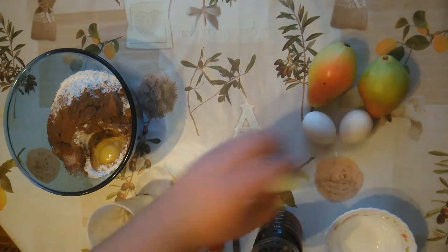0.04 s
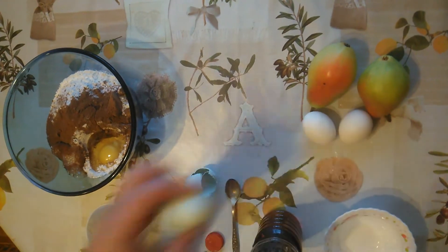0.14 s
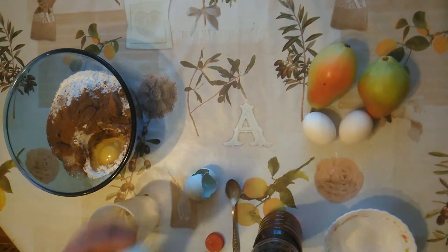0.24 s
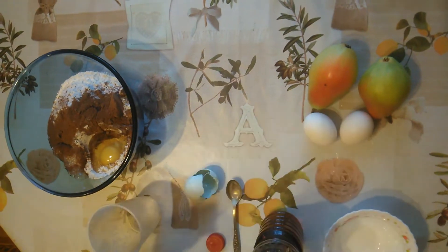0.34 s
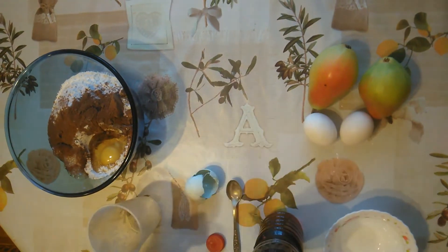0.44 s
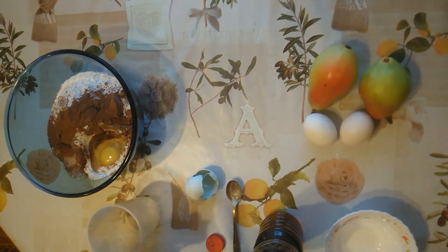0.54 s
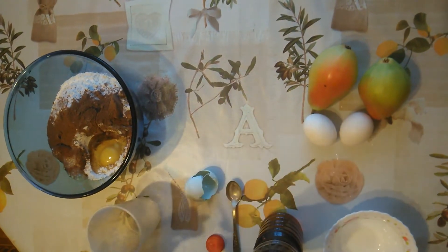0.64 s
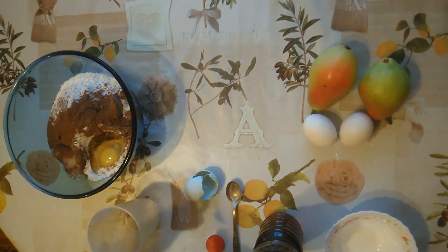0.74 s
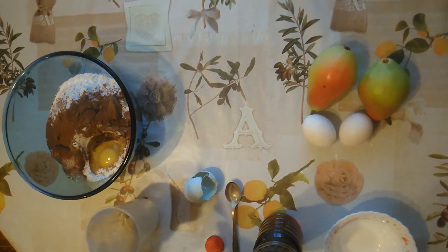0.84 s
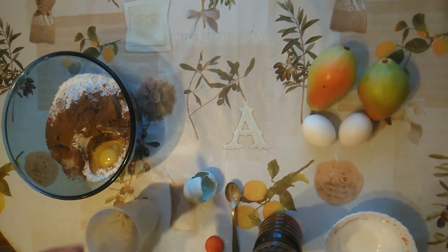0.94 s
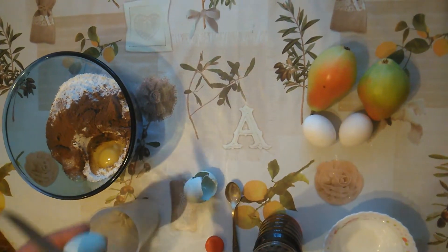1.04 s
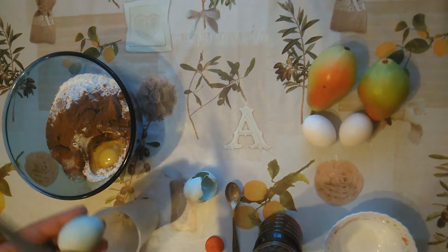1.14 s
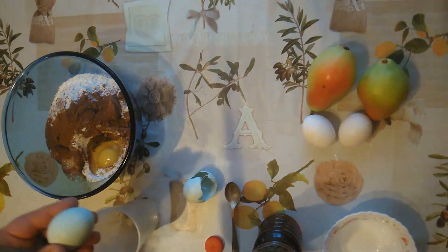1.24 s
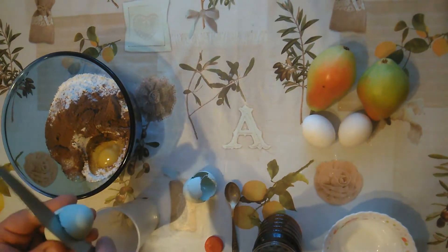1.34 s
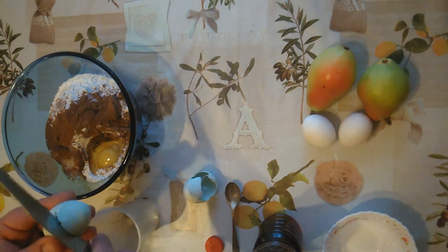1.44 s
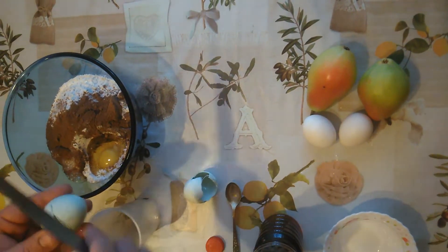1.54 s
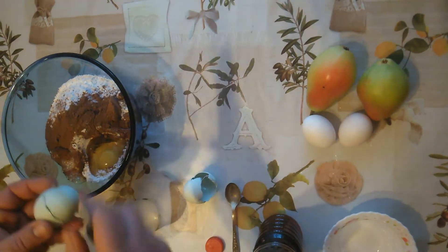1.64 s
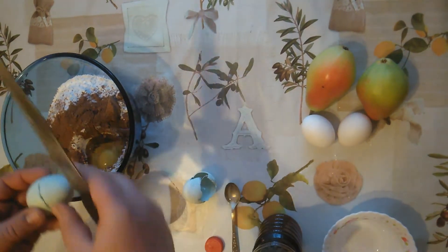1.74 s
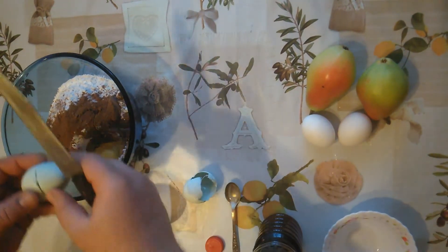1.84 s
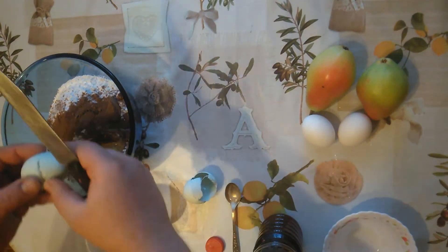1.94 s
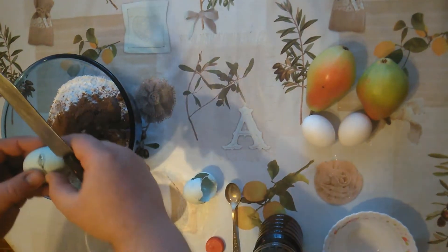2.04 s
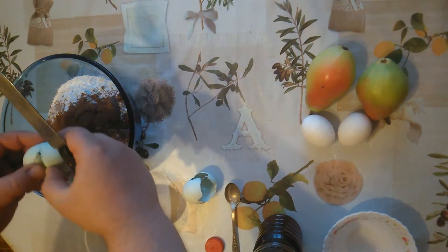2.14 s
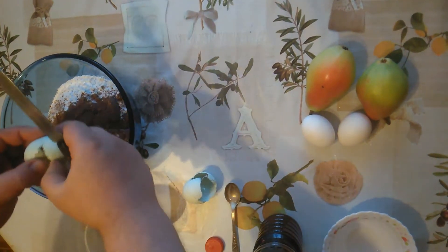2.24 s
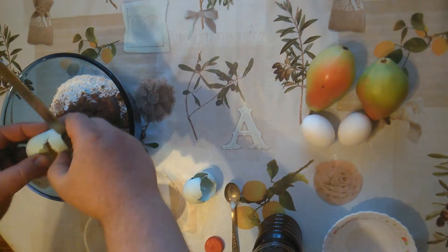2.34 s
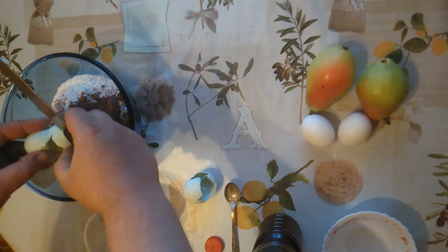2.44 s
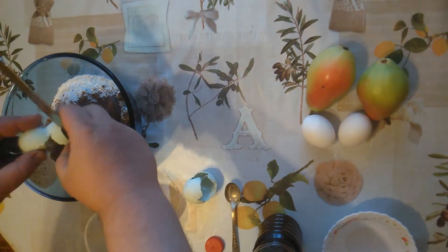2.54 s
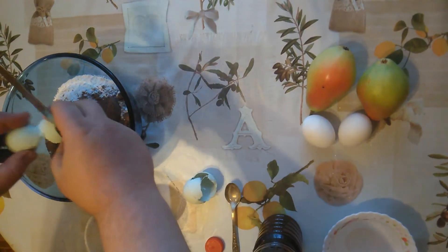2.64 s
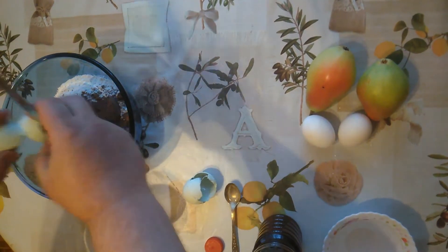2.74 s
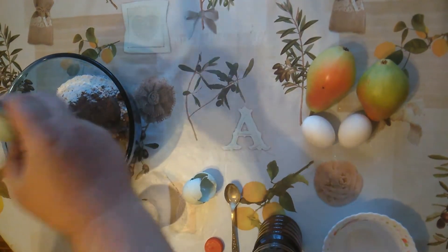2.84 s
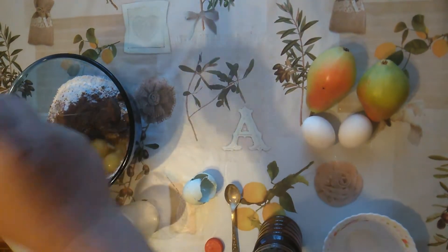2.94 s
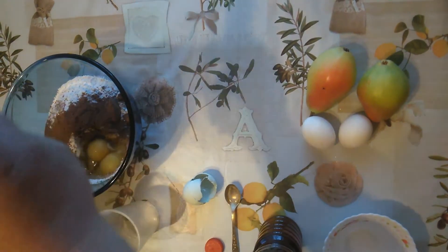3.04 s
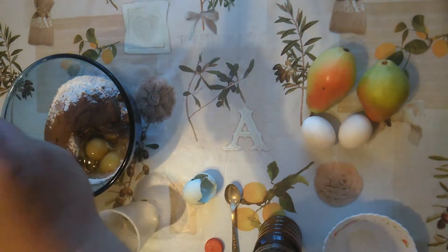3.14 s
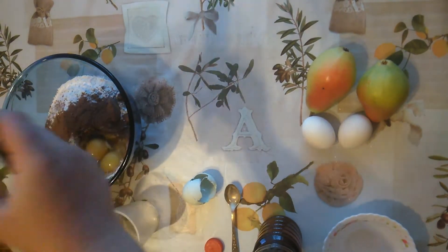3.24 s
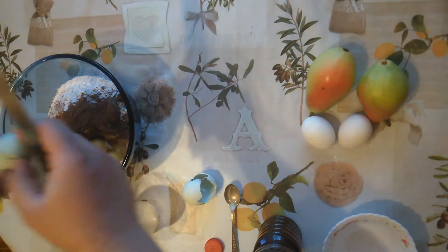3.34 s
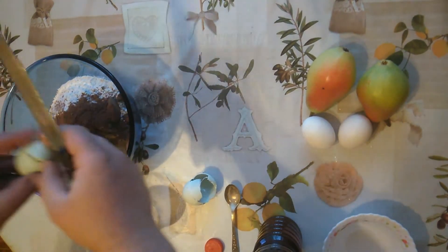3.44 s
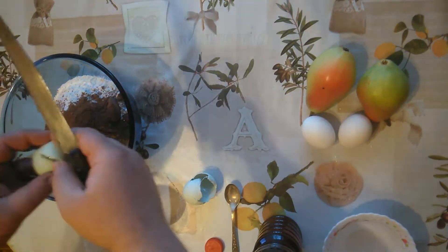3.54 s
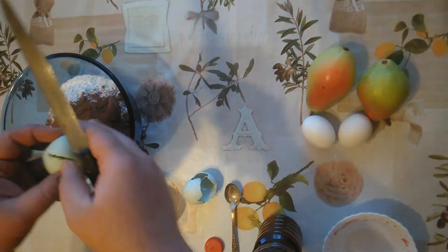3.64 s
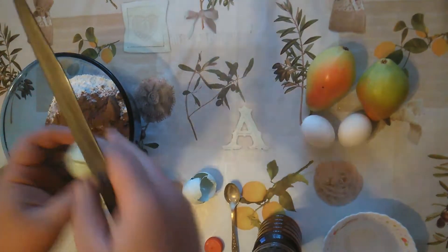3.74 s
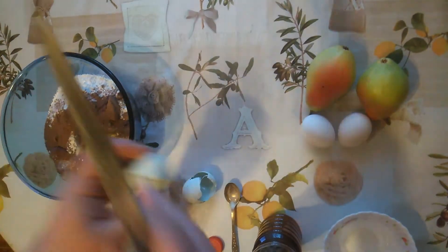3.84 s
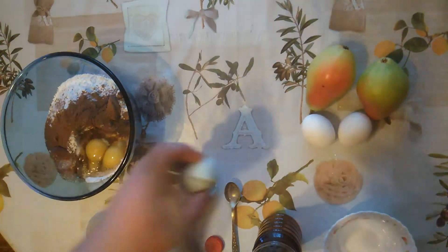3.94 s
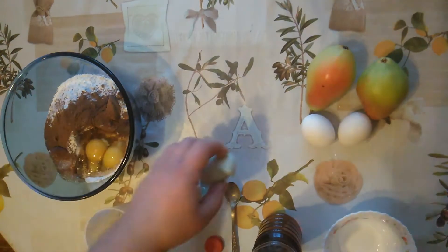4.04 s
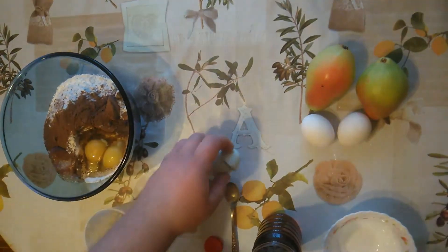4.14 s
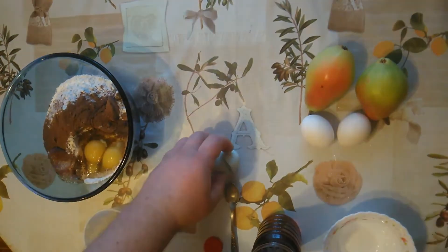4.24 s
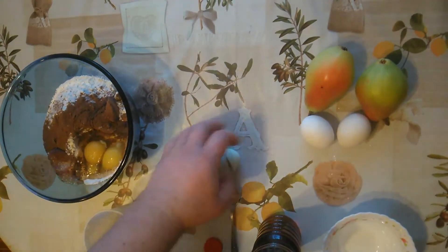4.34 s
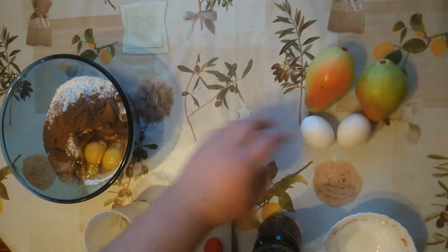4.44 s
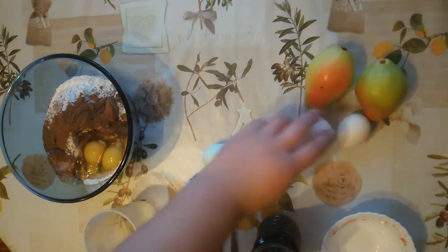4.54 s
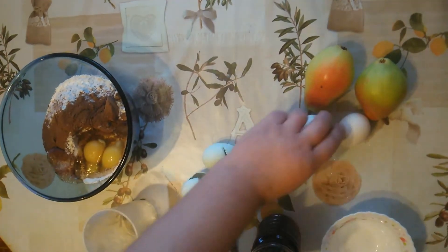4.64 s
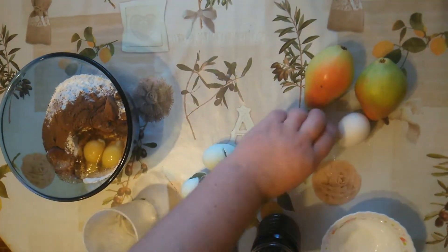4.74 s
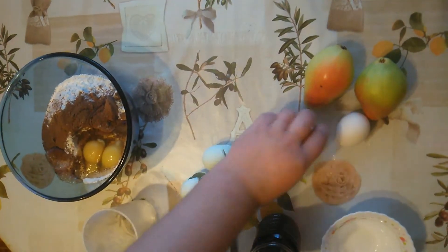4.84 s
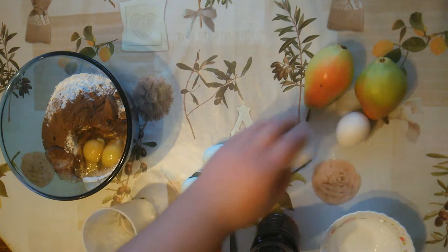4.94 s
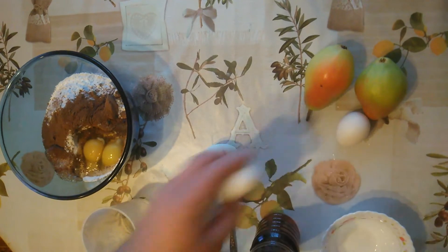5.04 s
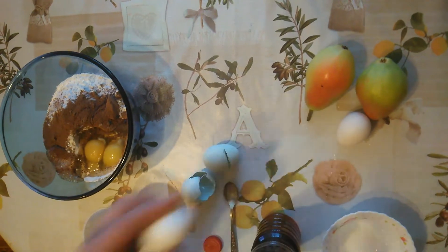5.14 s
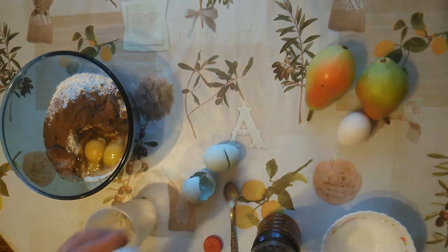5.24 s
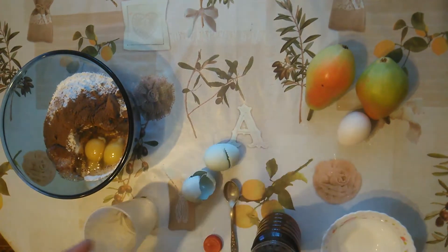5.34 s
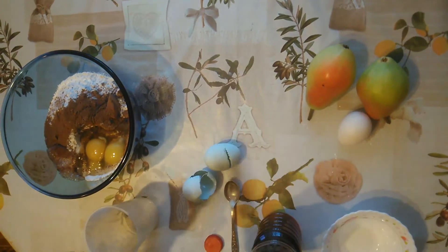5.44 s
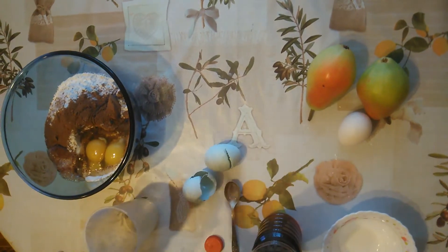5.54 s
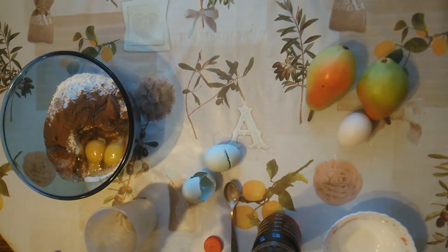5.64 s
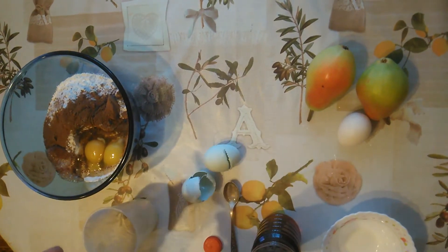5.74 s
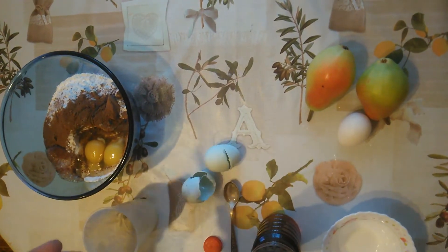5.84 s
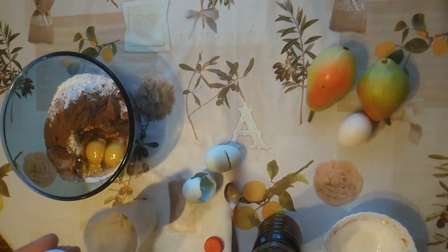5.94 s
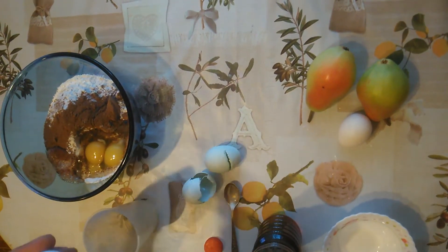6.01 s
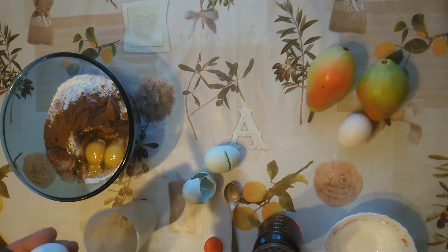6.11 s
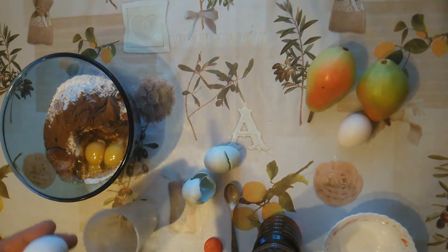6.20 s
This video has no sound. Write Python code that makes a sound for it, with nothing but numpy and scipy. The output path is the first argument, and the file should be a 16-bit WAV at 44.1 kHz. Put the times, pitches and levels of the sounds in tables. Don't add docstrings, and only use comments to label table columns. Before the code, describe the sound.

Close, dry eggshell cracks and crunches in a small echoing kitchen: one hard knife blow, brittle snapping, a light tap, another hard blow.

```python
import sys
import numpy as np
from scipy import signal
from scipy.io import wavfile

SR = 44100
rng = np.random.default_rng(int(sys.argv[2]) if len(sys.argv) > 2 else 0)


def bounce(signal):
    frames = np.transpose(np.atleast_2d(signal))
    limited = np.clip(frames, -1, 1)
    pcm = np.round(limited * 32767).astype(np.int16)
    wavfile.write(sys.argv[1], SR, pcm)


def volts_from_decibels(level):
    exponent = np.asarray(level, float) / 20
    return 10 ** exponent


N = 276507

# (time [s], level
# [dB])
BUSTLE = [(0.0, -56.5), (0.42, -61.5), (0.7, -60), (1.1, -56), (1.22, -53.5), (1.37, -53.5), (1.47, -46.5),
          (1.85, -57.5), (2.16, -55), (2.29, -60.5), (2.42, -48), (2.7, -49), (3.2, -57), (3.65, -50.5),
          (4.1, -54.5), (4.7, -53.5), (5.3, -57), (6.27, -53)]
# (time [s], room modes [dB], deep rumble [dB], spread [s])
THUDS = [(.07, -63, -66, 0.026), (.19, -55, -76, 0.077), (.52, -61.5, -73, 0.018), (.81, -65, -65.5, 0.071),
         (1.111, -54.5, -68, 0.028), (1.319, -52.5, -57, 0.018), (2.181, -51.5, -81, 0.0096),
         (2.38, -52, -70, 0.024), (2.62, -52, -68.5, 0.28), (2.88, -53.5, -73, 0.067),
         (3.099, -52.5, -73.5, 0.11), (3.33, -53.5, -59, 0.048), (3.47, -51, -67, 0.073),
         (3.6, -54.5, -67, 0.086), (3.79, -49, -68, 0.12), (4.03, -50.5, -59.5, 0.041),
         (4.152, -49, -68, 0.052), (4.37, -55.5, -76, 0.036), (4.52, -54, -72, 0.093),
         (4.9, -48, -66, 0.12), (5.099, -43.5, -74, 0.01), (5.259, -46, -71, 0.041), (5.55, -53, -83, 0.1),
         (5.66, -48, -62.5, 0.089), (5.859, -53, -69, 0.051), (6.04, -51, -78, 0.025),
         (6.162, -51.5, -63, 0.018), (6.27, -67, -66, 0.015)]
# (frequency [Hz], width [Hz], level [dB])
ROOM_MODES = [(162.3, 12, -23), (223, 4, 11.5), (258.3, 10, 12), (301, 2.6, 2), (346, 13, -24.5)]
# (frequency [Hz], density [dB per Hz])
MIDDLE_WASH = [(190, -12.5), (330, -7), (447, -2.5), (696, -5), (720, -2.5), (885, -16), (943, -6),
               (1000, -27.5), (1300, -12.5), (1690, -59.5), (2860, -120)]
# (frequency [Hz], density [dB per Hz])
HISS = [(710, -5), (1200, -25), (1270, -27), (1490, 0.5), (1870, -3.5), (2020, 0), (2110, 0), (2250, -5.5),
        (2590, -0.5), (3010, -9), (4550, -11), (9210, -24), (16000, -33)]
# (frequency [Hz], density [dB per Hz])
RUMBLE = [(20, -12), (40, -15.5), (70, -6), (110, -3), (160, 4.5), (200, -2)]
HISS_DB, HISS_FOLLOWS = -65, 0.98
MODES_DB, MODES_FOLLOW = -64.5, 0.68
DEEP_DB, DEEP_FOLLOWS = -76.5, 0.54

MOTOR_HZ = 49.33
# (multiple of shaft speed [1], level [dB])
WHINE = [(15, -74), (21, -81), (22, -77.5), (23, -73), (24, -73.5), (42, -71.5)]
# (start [s], hold [s], level [dB])
SINGING = [
    (1.198, 0.33, -53),
    (3.023, 0.13, -51.5),
]
SING_RISE_DB_PER_S, SING_FALL_DB_PER_S = 450, 309

# (start [s], hold [s], level [dB], hollow pitch [Hz], bright share [dB])
RUBS = [(0.0, 0.23, -35, 1600, -34), (0.035, 0.26, -49.5, 2700, -22), (0.045, 0.23, -60, 4330, -30),
        (1.569, 0.016, -32, 5340, -32.5), (1.573, 0.013, -16, 3710, -15), (1.593, 0.013, -41.5, 3830, -27),
        (0.884, 0.022, -44.5, 4130, -8), (2.48, 0.043, -30, 2500, -12), (2.168, 0.059, -35.5, 2760, -5.5),
        (2.156, 0.099, -35.5, 870, -21), (2.484, 0.058, -27, 1520, -9), (2.65, 0.0086, -32, 1490, -4.5),
        (2.72, 0.024, -32, 1810, -5), (3.084, 0.21, -40.5, 1990, -11.5), (3.309, 0.11, -27, 1370, -14),
        (3.478, 0.16, -24, 1380, -34), (3.55, .07, -43, 2350, -27), (3.66, 0.064, -19, 2200, -17),
        (3.825, 0.5, -55, 1450, 4.5), (4.389, 0.022, -15, 1310, -22), (4.331, 0.0084, -25, 1380, -15),
        (4.433, 0.19, -35.5, 1460, -38), (4.482, 0.31, -43, 2500, -33), (4.45, 0.25, -56, 4320, -25),
        (4.614, 0.28, -36.5, 1250, -47), (5.217, 0.51, -52, 4310, -25), (4.9, .8, -56, 2600, -30),
        (2.705, .06, -38, 1000, -20)]
RUB_RISE_DB_PER_S, RUB_FALL_DB_PER_S = 607.5, 297

# (time [s], peak [dB],
# hollow pitch [Hz], bright edge [dB])
TOUCHES = [(0.888, -40, 866, -14), (1.398, -30, 2200, -15), (1.566, -24, 5400, -21),
           (1.570, -26, 5530, -18), (1.578, -19, 1150, -16), (1.587, -25, 3800, -20),
           (1.596, -19, 3900, -17), (1.597, -23, 1900, -3), (5.986, -46, 5140, -30),
           (6.100, -32, 2110, -28), (6.147, -38, 1660, -44), (6.157, -31, 2170, -24),
           (6.1618, -13, 2000, -8), (6.1675, -13, 2100, 2), (6.172, -15, 2500, -16),
           (1.4195, -10.5, 2300, -13.5), (2.703, -31, 3100, -8), (2.643, -41, 5140, -3),
           (2.710, -40, 5200, -10), (2.753, -36, 2890, -11), (2.4705, -14.5, 3140, -11),
           (1.588, -25, 2190, -15), (5.832, -29, 890, -20), (5.836, -27, 4250, -15), (5.850, -23, 755, -7),
           (5.853, -34, 4250, -16), (5.869, -28, 710, -25), (5.878, -39, 4250, -25), (2.534, -30, 2600, -1),
           (3.699, -27.5, 2530, 1), (3.713, -22.5, 1385, -34), (3.542, -23, 4040, -10),
           (3.590, -26, 4150, -17)]
# (time [s], peak [dB], hollow pitch [Hz], bright edge [dB])
PRISING = [(2.162, -38, 2930, -15), (2.181, -29.5, 2820, -7), (2.377, -14.5, 3450, -14),
           (2.381, -15, 3030, -23), (2.394, -10.5, 2895, -13.5), (2.404, -16, 2590, -16),
           (2.411, -22, 2600, -13), (2.469, -13.5, 1660, -8), (2.487, -23, 2150, -29),
           (2.498, -32, 1840, -16), (2.505, -17.5, 1450, -27), (2.518, -17.5, 1550, -16),
           (2.532, -23, 1384, -21), (2.6435, -23, 1360, -14), (2.702, -21, 1597, -5.5),
           (2.741, -33, 800, -31), (2.729, -33, 900, -20), (2.754, -33, 900, -12), (2.852, -34, 1450, -33)]
# (time [s], peak [dB], hollow pitch [Hz], bright edge [dB])
SQUEEZING = [(3.111, -39, 2000, -31), (3.178, -36, 1460, -19), (3.203, -34, 1940, -15),
             (3.238, -34.5, 1460, -38), (3.265, -27.5, 1490, -19), (3.304, -26, 1460, -5),
             (3.347, -16.5, 1450, -27), (3.359, -16.5, 1420, -16.5), (3.378, -28.5, 2550, 6),
             (3.395, -37, 1340, -23), (3.411, -16.5, 1450, -35.5), (3.461, -30, 1290, -15.5),
             (3.476, -10, 1404, -23), (3.488, -12, 1470, -30), (3.494, -18, 1450, -27),
             (3.5385, -5.5, 1342, -30), (3.542, -9, 1410, -42), (3.551, -10, 1407, -27),
             (3.554, -23, 1450, -21), (3.559, -12, 1450, -20), (3.575, -14, 1380, -43),
             (3.586, -2.5, 1374, -13.5), (3.607, -22, 1310, -28), (3.637, -3.5, 1372, -18.5),
             (3.638, -8, 2150, -37), (3.642, -13, 2180, -12), (3.658, -14, 2350, -17),
             (3.669, -6, 1485, -11), (3.703, -12, 1383, -20), (3.710, -27, 1350, -30),
             (3.893, -34.5, 1200, -10)]
# (time [s], peak [dB], hollow pitch [Hz], bright edge [dB])
SETTLING = [(3.994, -40, 1110, -18), (4.058, -43.5, 3670, 4), (4.0945, -9.5, 1388, -13.5),
            (4.095, -20.5, 2070, -1), (4.332, -27, 1330, -12), (4.375, -23, 1410, -20),
            (4.381, -18.5, 1600, -2), (4.399, -17, 1210, -33), (4.423, -26, 1146, -34),
            (4.439, -24, 1310, -39), (4.477, -24, 1225, -37), (4.507, -27, 1260, -40),
            (4.632, -32, 773, -36), (4.666, -31, 1250, -39)]
PRISING_ROOM_DB, SQUEEZING_ROOM_DB, SETTLING_ROOM_DB, TOUCHES_ROOM_DB = -5.5, -7, -9, -9
RING_S, RING_AT_HZ, RING_SLOPE, RING_SPREAD_DB = 0.013, 1450, 0.73, 3
OVERTONE_LOW_RATIO, OVERTONE_SPAN_RATIO, OVERTONE_DB = 1.5, 0.45, -11

# (time [s], peak [dB], fracture length [s], ringing share [dB], room share [dB])
BLOWS = [
    (1.401, 0, 0.0044, 6.5, -1.5),
    (5.819, -23, 0.019, 7.5, 5),
    (6.1604, 0, 0.001, 8, -1),
]
# (frequency [Hz], density [dB per Hz])
BLOW_COLOURS = [
    [(240, -53), (400, -19.5), (1500, -11), (3000, -11.5), (4800, -9.5), (7000, -19.5), (10000, -28),
     (15000, -19)],
    [(240, -42), (400, -4), (900, -0.5), (2000, -14), (3700, -14), (5000, -12), (7000, -15), (15000, -24)],
    [(240, -53), (400, -34), (1500, -28), (3000, -7), (4300, -9), (6000, -16.5), (10000, -30.5),
     (15000, -12)],
]
# (frequency [Hz], peak [dB], t60 [s])
BLOW_MODES = [
    [(774, -8.5, 0.013), (862, -2.5, 0.07), (1110, -8.5, 0.029), (1250, -6, 0.011), (1600, -16, 0.01),
     (1980, -7.5, 0.027), (2216, -7.5, 0.037), (2300, -9.5, 0.02), (2700, -6.5, 0.019), (3100, -19, 0.013),
     (3570, -9, 0.038), (4205, -16, 0.012), (4840, -18, .02), (5500, -22.5, .015)],
    [(634, -1, 0.086), (720, -14, 0.035), (820, -4.5, 0.038), (1180, -4, 0.035), (1270, -1, 0.083),
     (1640, -10, 0.045), (2350, -6, 0.031), (2700, -7, 0.018), (3570, -6, 0.04), (4020, -15, .02),
     (4250, -1, 0.04), (4620, -14, .025), (5290, -7, 0.045), (6585, -20, 0.04)],
    [(765, -4, .011), (866, -1.5, 0.012), (1116, -3, .01), (1530, -10, 0.009), (1900, -0.5, 0.009),
     (2170, -2.5, 0.008), (2600, -11.5, 0.011), (3030, -27, 0.019), (3500, -19, 0.016),
     (4180, -15.5, 0.021)],
]
MODE_SWELL_SHARE = 0.36
FAR_RING_SHARE = 0.4

# (time [s], peak [dB])
TICKS = [(1.5662, -60), (1.5931, -48), (2.1668, -64), (2.3768, -52), (2.3943, -51), (2.4676, -50),
         (2.531, -54), (2.6427, -47), (2.7016, -54), (3.2628, -65), (3.3037, -52), (3.3461, -61),
         (3.3731, -56), (3.4609, -59), (3.5367, -53), (3.5861, -52), (3.637, -55), (3.6674, -51),
         (3.6988, -41), (4.0939, -43), (4.3209, -59), (4.3319, -53), (4.3803, -39), (5.8195, -58)]
TICK_S, TICK_LIFT_DB, TICK_ROOM_DB = 0.003, 4.5, -5

# (delay [s], level [dB])
ECHOES = [(0.0131, -18.5), (.0335, -15), (.042, -17.5), (.067, -16.5), (.087, -22.5), (.1, -22)]
# (frequency [Hz], t60 [s])
TAIL_T60 = [(300, 0.48), (1000, 0.32), (3000, 0.26), (8000, 0.32), (15000, 0.34)]
# (frequency [Hz], level [dB])
TAIL_COLOUR = [(300, 5.5), (900, -0.5), (1600, 4), (2500, 5), (3300, -2), (4300, 3), (7000, 0.5),
               (15000, 3.5)]
# (frequency [Hz], level [dB], t60 [s])
FURNITURE = [(761.3, -41, 0.16), (882, -42, .12), (1112.5, -42, .12), (1940, -44, 0.099), (2060, -44, .12),
             (2121, -42, .12), (2191, -41, 0.098), (2260, -46, 0.093), (2696, -42, .15)]
TAIL_DB = 0.6

# (frequency [Hz], width [Hz], lift [dB])
CAPSULE = [(2570, 930, -4), (4300, 2800, -30.5), (5600, 410, -13.5)]
THIN_HZ, DULL_HZ = 676, 10700


def rms_one(x):
    return x / np.sqrt(np.mean(x ** 2) + 1e-20)


def peak_one(x):
    return x / np.abs(x).max()


def in_time(rows):
    s, *columns = np.transpose(rows)
    return [np.interp(np.arange(N) / SR, s, c) for c in columns]


def at_hz(points, hz):
    return np.interp(np.log(hz), np.log(np.array(points)[:, 0]), np.array(points)[:, 1])


def drift(rate_hz):
    r = np.exp(-80 * np.pi * rate_hz / SR)
    slow = signal.lfilter([1], [1, -2 * r, r * r], rng.standard_normal(N // 40 + 2002))[2000:]
    return np.interp(np.arange(N) / 40, np.arange(len(slow)), rms_one(slow))


def swell(start_s, hold_s, rise_db_per_s, fall_db_per_s):
    t = np.arange(0, N + 32, 32) / SR - start_s
    db = np.minimum(rise_db_per_s * t, fall_db_per_s * (hold_s - t))
    return np.interp(np.arange(N) / 32, np.arange(len(t)), volts_from_decibels(np.minimum(0, db)))


def ring(clicks, hz, t60_s):
    r, w = volts_from_decibels(-60 / (t60_s * SR)), 2 * np.pi * hz / SR
    return signal.lfilter([0, np.sin(w)], [1, -2 * r * np.cos(w), r * r], clicks + 1e-18)


def band(x, low_hz, high_hz):
    return signal.sosfilt(signal.butter(2, [low_hz, high_hz], "band", fs=SR, output="sos"), x)


def banded_noise(spectrum, patchy_db, rate_hz):
    low_hz, top_hz = spectrum[0][0], spectrum[-1][0]
    edges = np.geomspace(low_hz, top_hz, int(3 * np.log2(top_hz / low_hz)) + 2)
    white, out = rng.standard_normal((2, N)), 0
    for k, (a, b) in enumerate(zip(edges, edges[1:])):
        gain = volts_from_decibels(at_hz(spectrum, np.sqrt(a * b)) + patchy_db * drift(rate_hz))
        out = out + gain * band(white[k % 2], a, b)
    return rms_one(out)


def coloured(x, spectrum):
    edges = np.geomspace(spectrum[1][0], min(spectrum[-1][0], 16000), 14)
    out = 0
    for k, (a, b) in enumerate(zip(edges, edges[1:])):
        out = out + (-1) ** k * volts_from_decibels(at_hz(spectrum, np.sqrt(a * b))) * band(x, a, b)
    return out


def fracture(length_s, draws, first=0.29):
    t = np.arange(draws.shape[1]) / SR
    breaks = (draws[0] < 0.12) * (2 * draws[1] - 1)
    burst = breaks * np.exp(-t / np.clip(length_s, 2e-4, 0.05))
    burst[0] = first
    return burst


def place(out_len, s, peak_db, sound):
    out, i = np.zeros(out_len), round(s * SR)
    out[i:i + len(sound)] = (volts_from_decibels(peak_db) * peak_one(sound))[:out_len - i]
    return out


def housing(x):
    out = x
    for hz, width_hz, db in CAPSULE:
        half_hz = max(width_hz, 500) / 2
        out = out + volts_from_decibels(db) * band(x, hz - half_hz, hz + half_hz)
    return out


def house():
    middle_db, = in_time(BUSTLE)
    busy_db = middle_db - middle_db.mean()
    t = np.arange(N, dtype=np.float32) / SR
    low_power = volts_from_decibels(MODES_DB + MODES_FOLLOW * busy_db) ** 2
    deep_power = volts_from_decibels(DEEP_DB + DEEP_FOLLOWS * busy_db) ** 2
    for s, low_db, deep_db, spread_s in THUDS:
        hump = np.exp(-np.minimum(((t - s) / max(spread_s, 0.01)) ** 2, 50))
        low_power = low_power + volts_from_decibels(low_db) ** 2 * hump
        deep_power = deep_power + volts_from_decibels(deep_db) ** 2 * hump
    white = rng.standard_normal(N)
    modes = sum(volts_from_decibels(db) * rms_one(ring(white, hz, 1.1 / width_hz)) for hz, width_hz, db in ROOM_MODES)
    modes = np.sqrt(low_power) * rms_one(band(modes, 239.7, 380))
    wash = volts_from_decibels(middle_db) * banded_noise(MIDDLE_WASH[1:-2], patchy_db=4.0, rate_hz=17.0)
    hiss = rms_one(housing(banded_noise(HISS, patchy_db=1.16, rate_hz=8.9)))
    hiss = volts_from_decibels(HISS_DB + HISS_FOLLOWS * busy_db) * hiss
    deep = np.sqrt(deep_power) * banded_noise(RUMBLE, patchy_db=0.5, rate_hz=10.0)
    return modes + wash + hiss + deep


def motor():
    turn = 2 * np.pi * MOTOR_HZ * np.arange(N) / SR
    whine = 0
    for k, db in WHINE:
        whine = whine + volts_from_decibels(db + 1.5 * drift(12.0)) * np.sin(round(k) * turn + 6 * rng.random())
    singing = sum(volts_from_decibels(db) * swell(s, hold_s, SING_RISE_DB_PER_S, SING_FALL_DB_PER_S)
                  for s, hold_s, db in SINGING)
    return np.sqrt(2) * (whine + singing * np.sin(14 * turn))


def rustle():
    sizes = volts_from_decibels(0.88 * np.minimum(rng.exponential(1, N), 5)) * rng.choice([-1, 1], N)
    grains = sizes * (rng.random(N) < 7000 * volts_from_decibels(3 * drift(25)) / SR)
    pitches_hz = np.geomspace(700, 5800, 26)
    dealt = rng.integers(0, 26, N)
    rings = np.array([rms_one(ring(grains * (dealt == k), hz, 33 / hz)) for k, hz in enumerate(pitches_hz)])
    bright = rms_one(band(grains, 3500, 4700)) + rms_one(band(grains, 6100, 9000))
    out = np.zeros(N)
    for s, hold_s, level_db, hollow_hz, bright_db in RUBS:
        floor_db = -23 - 5.5 * np.maximum(np.log2(pitches_hz / 2000), 0)
        weights = volts_from_decibels(np.maximum(-70 * np.abs(np.log2(pitches_hz / hollow_hz)), floor_db))
        on = slice(max(round((s - 0.15) * SR), 0), round((s + hold_s + 0.35) * SR))
        body = weights @ rings[:, on] / np.sqrt(np.sum(weights ** 2))
        gain = volts_from_decibels(level_db - 19.0) * swell(s, hold_s, RUB_RISE_DB_PER_S, RUB_FALL_DB_PER_S)[on]
        out[on] += gain * (body + volts_from_decibels(bright_db - 8.5) * bright[on])
    return out


def snaps():
    actions = [(PRISING, PRISING_ROOM_DB), (SQUEEZING, SQUEEZING_ROOM_DB),
               (SETTLING, SETTLING_ROOM_DB), (TOUCHES, TOUCHES_ROOM_DB)]
    rows = [(*row, room_db) for table, room_db in actions for row in table]
    out, draws = np.zeros((2, N)), rng.random((100, 4, SR // 16))
    for (s, peak_db, hz, edge_db, room_db), d in zip(rows, draws):
        spread_db = RING_SPREAD_DB * (2 * d[3, 0] - 3.0)
        t60_s = RING_S * (RING_AT_HZ / hz) ** RING_SLOPE * volts_from_decibels(spread_db)
        burst = fracture(0.00068, d[:2], first=0.72)
        splinters = fracture(0.0063, d[2:], first=0.58)
        hollow = peak_one(ring(ring(ring(burst, hz, t60_s), hz, 1.1 * t60_s), hz, 1.1 * t60_s))
        upper_hz = (OVERTONE_LOW_RATIO + OVERTONE_SPAN_RATIO * d[2, 0]) * hz
        overtone = peak_one(ring(ring(burst, upper_hz, 0.84 * t60_s), upper_hz, 0.55 * t60_s))
        overtone_db = OVERTONE_DB - 7.9 * max(np.log2(hz / RING_AT_HZ), 0)
        edge = band(band(splinters, 1700, 4700), 1500, 6400)
        edge = peak_one(edge + volts_from_decibels(-30.5) * band(splinters, 8800, 15500))
        sound = hollow + volts_from_decibels(overtone_db) * overtone + volts_from_decibels(edge_db + 6.0) * edge
        sound = place(SR // 16, 0, peak_db - 6.0, sound)
        i = round((s - 0.001) * SR)
        out[:, i:i + len(sound)] += sound * volts_from_decibels(np.array([[0], [room_db]]))
    return out


def egg(burst, modes, share):
    out = 0
    for k, (hz, db, t60_s) in enumerate(modes):
        struck = ring(burst, hz, share * np.clip(t60_s, 0.004, 1 / 16))
        swelling = ring(struck, hz, MODE_SWELL_SHARE * share * max(t60_s, 0.004))
        out = out + (-1) ** k * volts_from_decibels(db) * peak_one(swelling)
    return peak_one(out)


def crunch(burst, colour):
    return peak_one(coloured(signal.lfilter([1], [1, -1.1, 0.3], burst), colour))


def knife():
    out = np.zeros((2, N))
    for (s, peak_db, length_s, ring_db, room_db), colour, modes in zip(BLOWS, BLOW_COLOURS, BLOW_MODES):
        burst = fracture(length_s, rng.random((2, SR // 5)))
        burst[1:] *= 0.45
        click = np.eye(1, len(burst))[0]
        near = volts_from_decibels(ring_db) * egg(burst, modes, 0.94) + crunch(burst, colour)
        far_body = volts_from_decibels(ring_db) * egg(click, modes, FAR_RING_SHARE)
        far = volts_from_decibels(-3.5) * far_body + volts_from_decibels(5.5) * crunch(click, colour)
        out[0] += place(N, s - 0.0004, peak_db - 0.5, near)
        out[1] += place(N, s - 0.0004, peak_db + room_db - 4.5, far)
    return out


def ticks():
    out, draws = np.zeros(N), rng.random((40, 2, SR // 50))
    for (s, peak_db), d in zip(TICKS, draws):
        puff = band(fracture(TICK_S, d, first=0.6), 6000, 12500)
        out += place(N, s - 0.0005, peak_db + TICK_LIFT_DB, puff)
    return out * volts_from_decibels(np.array([[0], [TICK_ROOM_DB]]))


def kitchen(x):
    t = np.arange(SR // 2) / SR
    edges, tail = np.geomspace(200, 17000, 17), 0
    uneven_db = 2.8 * rng.standard_normal(len(t) // 63 + 1).repeat(63)[:len(t)]
    white = rng.standard_normal((2, len(t))) * volts_from_decibels(uneven_db)
    for k, (a, b) in enumerate(zip(edges, edges[1:])):
        hz = np.sqrt(a * b)
        decay_db = at_hz(TAIL_COLOUR, hz) - 60 * t / at_hz(TAIL_T60, hz)
        tail = tail + volts_from_decibels(decay_db) * band(white[k % 2], a, b)
    tail = volts_from_decibels(TAIL_DB - 30) * tail * np.clip(t / 0.005, 0, 1)
    for hz, db, t60_s in FURNITURE:
        tail = tail + volts_from_decibels(db - 60 * t / max(t60_s, 0.03)) * np.sin(2 * np.pi * hz * t)
    for delay_s, db in ECHOES:
        tail[round(delay_s * SR)] += volts_from_decibels(db)
    return signal.fftconvolve(x, tail)[:N]


def scene():
    direct, to_room = knife() + snaps() + ticks()
    shell = housing(direct + kitchen(to_room) + rustle())
    shell = signal.sosfilt(signal.butter(4, THIN_HZ, "high", fs=SR, output="sos"), shell)
    shell = signal.sosfilt(signal.butter(2, DULL_HZ, fs=SR, output="sos"), shell)
    return (shell + house() + motor())[None]


def band_limit(x):
    return signal.sosfilt(signal.butter(12, 16310, fs=SR, output="sos"), x)


def record(dry):
    mix = dry / (1 + np.abs(dry) ** 12) ** (1 / 12)
    return band_limit(mix)


dry = scene()
out = record(dry)
bounce(out)
```